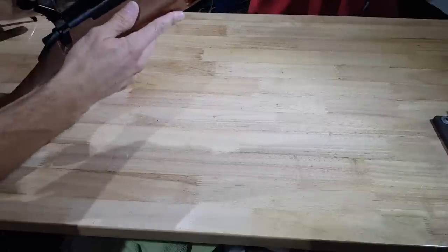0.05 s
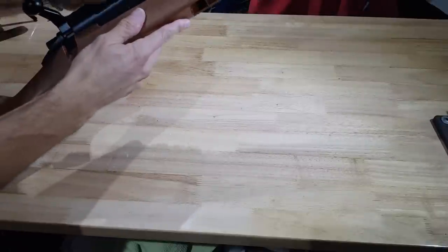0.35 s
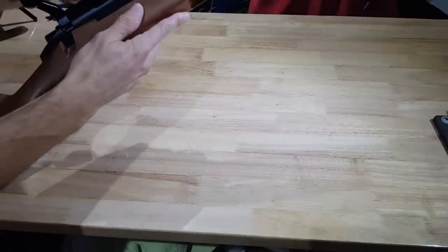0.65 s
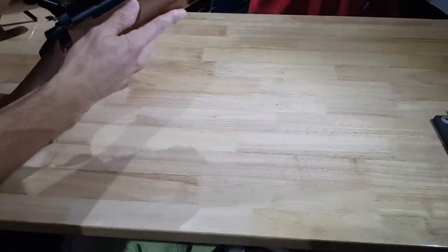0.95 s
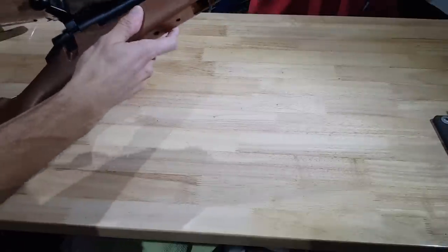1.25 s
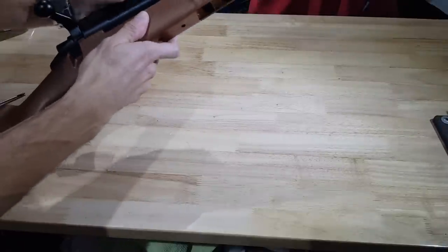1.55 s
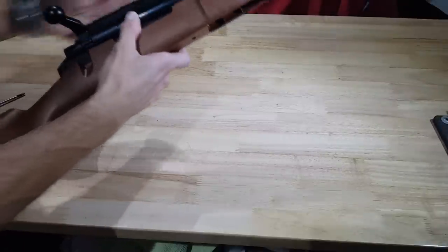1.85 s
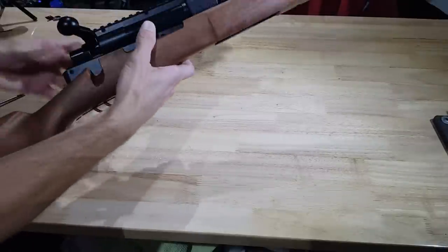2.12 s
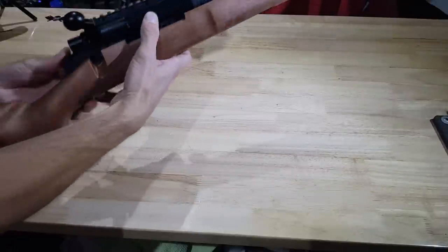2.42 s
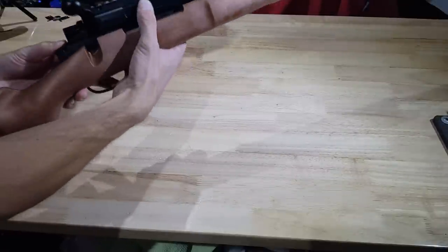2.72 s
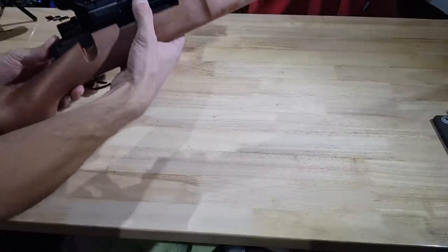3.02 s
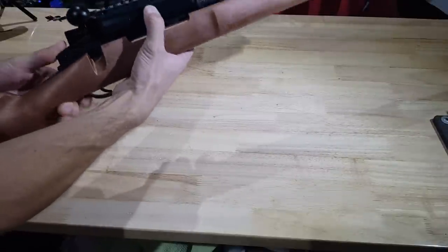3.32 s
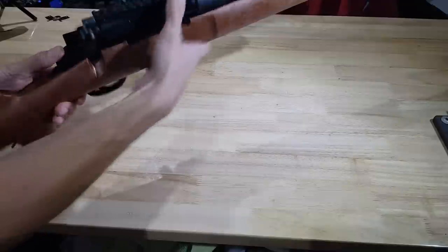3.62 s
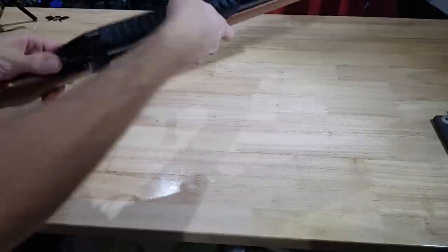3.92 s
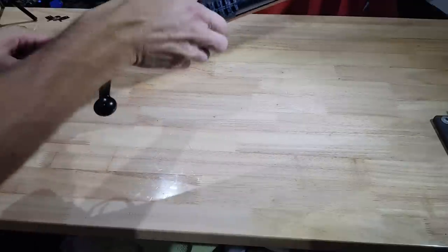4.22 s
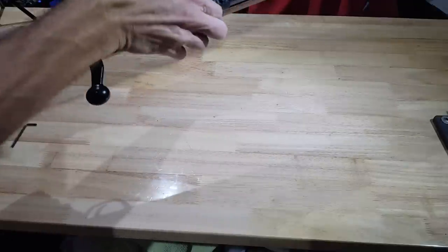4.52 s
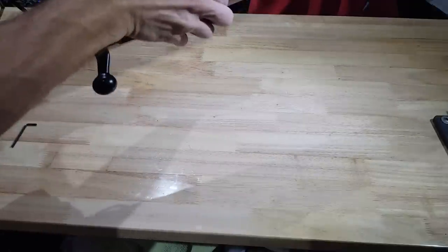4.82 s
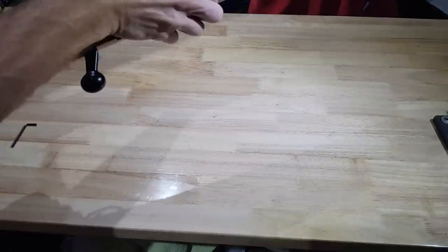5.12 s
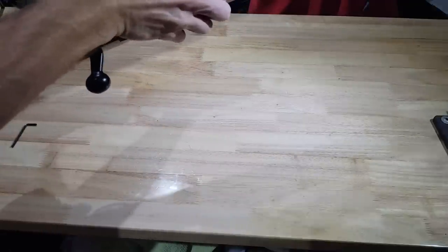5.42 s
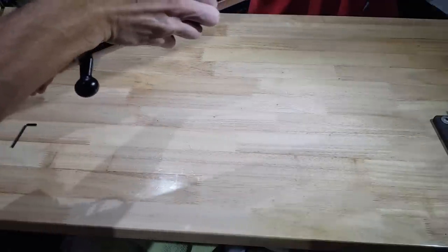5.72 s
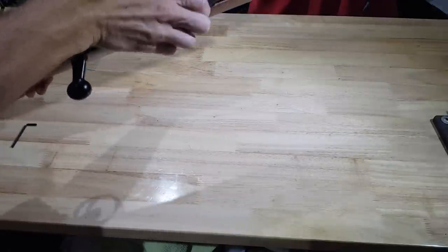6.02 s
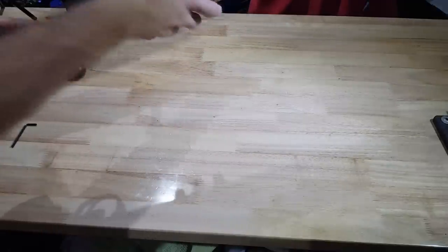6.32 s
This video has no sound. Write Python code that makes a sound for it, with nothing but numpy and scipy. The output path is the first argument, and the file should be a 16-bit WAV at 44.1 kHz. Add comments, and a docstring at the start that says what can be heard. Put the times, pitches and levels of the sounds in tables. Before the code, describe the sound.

Close up and slightly to the left, plastic parts click and knock irregularly as a toy rifle is turned over on a workbench. Hands slide softly over the hollow stock between the clicks. The action is then pushed back into place with scraping, brief metallic rings and dull thumps, building to a quick run of hard clacks near the end. The small room adds a short echo, low hum and faint hiss.

```python
"""Toy rifle on a workbench

A toy bolt-action rifle is turned over in a small room, and its action is pressed back into the stock.
Plastic parts click, knock and scrape, ringing the hollow stock. Heavy blows thump the bench, a steel
part rings now and then, and hands slide over the stock. A low hum and a faint hiss lie underneath."""
import sys
import numpy as np
from scipy import signal
from scipy.fft import rfft, irfft, next_fast_len
from scipy.io import wavfile
from scipy.ndimage import map_coordinates

SR = 44100
rng = np.random.default_rng(int(sys.argv[2]) if len(sys.argv) > 2 else 0)


def inscribe(sig):
    """Save sig as 16-bit PCM at rate SR to the path in sys.argv[1].

    A 1-D sig is mono; a 2-D sig holds one channel per row.
    Samples are clipped to [-1, 1] before scaling.
    """
    pcm = np.round(np.clip(np.atleast_2d(sig).T, -1, 1) * 32767)
    wavfile.write(sys.argv[1], SR, pcm.astype(np.int16))


N = 284753


def amp(db):
    """Turn decibels into a gain to multiply by."""
    return 10 ** (np.asarray(db) / 20)


def unit(x):
    """Scale a sound to an average power of 1."""
    return x / np.sqrt(np.mean(x ** 2) + 1e-20)


def fade(t, t60):
    """Die away by 60 dB every t60 seconds."""
    return amp(-60 * t / np.maximum(t60, 1e-3))


def along(points, hz):
    """Read between the rows of a (frequency, value) table, with octaves evenly spaced."""
    f, v = np.transpose(points)
    return np.interp(np.log(hz + 1), np.log(f), v)


def wobble(rate):
    """A smooth curve through `rate` random values a second."""
    return map_coordinates(rng.standard_normal(int(N * rate / SR) + 4), [np.arange(N) * rate / SR])


def swell(s, length):
    """Grow smoothly louder until time s, then fade again."""
    stroke = np.zeros(N)
    near = np.arange(max(int((s - 2 * length) * SR), 0), min(int((s + 2 * length) * SR), N))
    stroke[near] = np.exp(-2 * ((near / SR - s) / length) ** 2)
    return stroke


def resonance(hz, centre, width):
    """The power curve of one ringing tone: 1 at its centre, less to either side."""
    return 1 / (1 + (2 * (hz - centre) / width) ** 2)


def filtered(x, response):
    """Scale each frequency in x by response(hz)."""
    size = x.shape[-1]
    padded = next_fast_len(2 * size)
    return irfft(rfft(x, padded) * response(np.fft.rfftfreq(padded, 1 / SR)), padded)[..., :size]


def causal(gain):
    """A filter with these gains that rings only after it is struck (minimum phase)."""
    cepstrum = irfft(np.log(np.maximum(gain, 1e-5)))
    half = cepstrum.shape[-1] // 2
    return np.exp(rfft(cepstrum * np.r_[1, np.full(half - 1, 2), 1, np.zeros(half - 1)]))


def panned(lean_db):
    """Left and right gains: the left is lean_db louder, and the total power stays the same."""
    gains = amp(np.array([np.atleast_1d(lean_db), -np.atleast_1d(lean_db)]) / 2)
    return gains / np.sqrt(np.mean(gains ** 2, axis=0))


def add(track, s, sound):
    """Mix a sound in at time s."""
    part = track[:, max(round(s * SR), 0):][:, :sound.shape[1]]
    part += sound[:, :part.shape[1]]


# how alike the two ears' sounds are: f/Hz, likeness (1 = the same)
EAR_LIKENESS = [(100, .92), (350, .8), (700, .6), (1400, .35), (2800, .2), (5600, .05)]
def stereo_noise(size, spectrum):
    """Shaped noise, alike in both ears in the bass and unrelated in the treble."""
    def response(hz):
        turn = np.arccos(np.clip(along(EAR_LIKENESS, hz), -1, 1)) / 2
        return amp(along(spectrum, hz)) * [np.cos(turn), np.sin(turn)]
    mid, side = filtered(rng.standard_normal((2, size)), response)
    return unit(np.array([mid + side, mid - side]))


# tone of the room's hiss: f/Hz, level/dB
AIR_TONE = [(20, -1.5), (60, 1), (100, 4), (160, -2.5), (300, -13.5), (700, -15.5), (1500, -26),
            (4000, -11), (6000, -9), (8000, -23.5), (11000, -13), (16000, -22.5)]
def background(hum_hz, hum_db, air_db):
    """A low, slightly wavering hum under the room's hiss."""
    phase = 2 * np.pi * np.cumsum(hum_hz + 0.99 * wobble(5.6)) / SR
    hum = amp(hum_db + .8 * wobble(5)) * unit(np.sin(phase))
    return hum * panned(lean_db=3.5) + amp(air_db) * stereo_noise(N, AIR_TONE)


# how long the room echoes: f/Hz, t60/s
ECHO_T60 = [(150, 0.28), (500, 0.35), (1500, 0.4), (4000, 0.41), (8000, 0.32), (14000, 0.27)]
# tone of that echo: f/Hz, level/dB
ECHO_TONE = [(150, -1.5), (500, 1.5), (1000, 1), (1350, -2.5), (1900, -2), (4000, -5), (8000, -1.5),
             (14000, 0.5)]
def room_echo(sound, build_s, size=22050):
    """The room answers a sound with a short wash of echoes; the middle pitches last longest."""
    hz, t, noise = signal.stft(stereo_noise(size, [(20, 0), (20000, 0)]), SR, nperseg=256)
    dying = noise * fade(t, along(ECHO_T60, hz)[:, None]) * amp(along(ECHO_TONE, hz))[:, None]
    tail = signal.istft(dying, SR, nperseg=256)[1][:, :size]
    tail *= 1 - np.exp(-(np.arange(size) / SR / build_s) ** 2)
    tail /= np.sqrt(np.sum(tail ** 2) / 2)
    return signal.fftconvolve(sound, tail, axes=1)


# tone of rubbing skin: f/Hz, level/dB
RUB_TONE = [(200, -20.5), (500, -11.5), (900, -11), (1360, 1), (1800, -7), (2700, -2), (4200, 2),
            (6000, -4.5), (8000, -25), (16000, -41)]
# tone of its fine hiss: f/Hz, level/dB
HISS_TONE = [(2000, -38.5), (6000, 2), (8000, -6), (11500, 1), (14500, -5), (17000, -4.5), (19000, -30)]
# hand strokes over the stock: middle t/s, length/s, level/dB
HAND_STROKES = [(0.241, 0.085, -53), (0.525, 0.02, -49), (1.183, 0.058, -55.5), (1.624, 0.11, -54),
                (1.998, 0.021, -60), (2.315, 0.2, -61), (2.937, 0.035, -52.5), (3.229, 0.047, -53.5),
                (3.6, 0.18, -52), (3.757, 0.039, -51), (4.02, 0.23, -54.5), (6.45, 0.15, -57.5)]
def sliding_hands(hiss_db, hiss_growth, usual_db):
    """Skin slides over the stock with a smooth rub; a faster slide is louder and hisses more."""
    rub, hiss = np.zeros((2, N))
    for s, length, db in HAND_STROKES:
        stroke = swell(s, length)
        rub += amp(db) * stroke
        hiss += amp(hiss_db + hiss_growth * (db - usual_db)) * stroke
    return (rub * stereo_noise(N, RUB_TONE) + hiss * stereo_noise(N, HISS_TONE)) * amp(wobble(35))


def drags(max_gap_s=.05, gap_share=0.74, base_db=-39.5, growth=0.53):
    """Parts stay in touch and scrape between the clicks of one push: middle t/s, length/s, level/dB."""
    return [((s + next_s) / 2, gap_share * (next_s - s), base_db + growth * min(db, next_db))
            for (s, db, *_), (next_s, next_db, *_) in zip(PART_HITS, PART_HITS[1:])
            if next_s - s < max_gap_s]


# tone of scraping plastic: f/Hz, level/dB
SCRAPE_TONE = [(120, -40), (200, -27.5), (529, -26), (647, -31.5), (1480, -3.5), (1770, -18.5),
               (1940, -7.5), (2510, -14), (3370, -8), (5730, -15), (8270, -30), (11100, -33),
               (16000, -62.5)]
# a knock dying away at the start, then parts sliding into place: middle t/s, length/s, level/dB
PLASTIC_SWELLS = [(0, 0.065, -52.5), (.265, 0.01, -50), (.625, 0.031, -53), (.872, 0.014, -34.5),
                  (1.724, .011, -44.5), (2.63, 0.037, -57.5), (3.86, 0.056, -65.5), (3.315, 0.017, -57.5),
                  (4.34, 0.039, -56.5), (4.7, 0.06, -43), (5.006, 0.035, -55), (5.336, 0.023, -44),
                  (5.66, 0.051, -57), (5.8, 0.1, -50), (6.018, 0.03, -50), (6.038, 0.01, -30)]
def scraping_parts(level_db, slip_db, grain_db):
    """Plastic scrapes in uneven little slips; the same rough noise makes the opening knock's tail."""
    slips = unit(amp(slip_db * wobble(64) + grain_db * wobble(600)))
    swells = sum(amp(db + level_db) * swell(s, length) for s, length, db in [*PLASTIC_SWELLS, *drags()])
    return stereo_noise(N, SCRAPE_TONE) * slips * swells


# blows that set the steel ringing: t/s, level/dB
STEEL_HITS = [(3.108, -46), (4.39, -29.5), (4.692, -44), (6.037, -38)]
# the steel's ringing tones: f/Hz, level/dB, t60/s
STEEL_TONES = [(1588, -10, .14), (2859, -22, .4), (3628, -9, .27), (3760, 9, .035), (3953, -10, .3),
               (4122, -8, .35), (4230, -13, .28), (5943, -23, .33), (6831, -22, .2), (7960, -24, .24),
               (9647, -27, .23)]
def ringing_steel(attack_s=0.00026, size=26000):
    """A steel part rings on after a few hard blows."""
    track, t = np.zeros((2, N)), np.arange(size) / SR
    onset = 1 - np.exp(-t / attack_s)
    for s, db in STEEL_HITS:
        for hz, tone_db, t60 in STEEL_TONES:
            phase = 2 * np.pi * rng.random() + rng.standard_normal((2, 1))  # each ear has its own
            add(track, s, amp(db + tone_db) * np.sin(2 * np.pi * hz * t + phase) * fade(t, t60) * onset)
    return track * panned(lean_db=8)


def seating(t, attack_s=.0014):
    """A blow builds up as the parts settle against each other."""
    return 1 - np.exp(-(t / attack_s) ** 2)


# the hollow stock's ringing tones: f/Hz, width/Hz, level/dB
STOCK_TONES = [(175, 12, 4.5), (359.5, 50.5, 10.5), (533, 130, 3), (742, 36, 5), (772, 120, -4),
               (885, 120, -1.5), (1296, 226, 8.5), (1763, 24, -6), (2130, 44, -16), (2230, 28, -19),
               (2738, 69, 4.5), (3590, 40, 4), (3765, 120, -2.5), (4260, 330, -1), (4700, 110, 0)]
def stock_gain(hz, between_db):
    """The stock favours its own tones; many weak ones fill the gaps between them."""
    peaks = sum(amp(2 * db) * resonance(hz, centre, width) for centre, width, db in STOCK_TONES)
    return np.sqrt(peaks + amp(2 * between_db))


# tone of the bench's thump: f/Hz, level/dB
BENCH_TONE = [(40, -12.5), (70, -1.5), (120, 1), (195, 6.5), (260, -12.5), (400, -31), (1000, -66)]
# blows that shake the whole rifle: t/s, bench level/dB, stock level/dB
HEAVY_HITS = [(0.868, -74, -32.5), (4.694, -46, -58), (5.073, -59, -59), (5.354, -59, -71),
              (5.727, -44.5, -69), (5.866, -43, -50), (6.037, -43, -36)]
def heavy_blows(bench_t60, room_db, size=16384):
    """The bench answers with a dull thump, and four of the stock's low tones boom."""
    track, t = np.zeros((2, N)), np.arange(size) / SR
    tones = sum(amp(db) * np.cos(2 * np.pi * hz * t) * np.exp(-np.pi * width * t)
                for hz, width, db in STOCK_TONES[1:5])
    boom = (tones * seating(t))[None]
    thump_shape = fade(t, bench_t60) * (1 - np.exp(-t / .002))
    for s, bench_db, boom_db in HEAVY_HITS:
        add(track, s, amp(bench_db) * stereo_noise(size, BENCH_TONE) * thump_shape)
        add(track, s, amp(boom_db) * boom)
        add(track, s, amp(boom_db + room_db) * room_echo(boom, build_s=.005))
    return track * panned(lean_db=5.0)


# the air space in the stock as the grip changes: t/s, level against the click/dB, f/Hz
CAVITY_GRIP = [(.52, -5.5, 1460), (.64, 7, 1230), (.87, -6.5, 1370), (1.3, -4, 1310), (2.2, -7, 1400),
               (2.64, 9.5, 1370), (3.1, -0.5, 1380), (3.34, 3, 1370), (3.7, -5, 1470), (4.3, 2.5, 1496),
               (4.7, -8.5, 1300), (5.049, -4.5, 1370), (6.04, -6, 1090)]
def stock_cavity(s, weight_db, click_hz, usual_weight_db=-11.5, usual_click_hz=2940):
    """The grip damps and tunes the cavity; weight drives it more, small high-pitched parts less."""
    times, levels, pitches = np.transpose(CAVITY_GRIP)
    drive_db = 0.33 * (weight_db - usual_weight_db) - 3 * np.log2(click_hz / usual_click_hz)
    return np.interp(s, times, levels) + drive_db, np.interp(s, times, pitches)


# tone of parts chattering together: f/Hz, level/dB
CHATTER_TONE = [(50, -22), (120, -14), (220, -8), (350, 0), (1200, 0), (4500, 0), (6200, -1), (8000, -7),
                (11000, -2), (15500, -7), (19000, -16)]
# extra lean of the clicks to one side: f/Hz, left minus right/dB
CLICK_LEAN = [(100, -2.5), (300, -4), (550, 2.5), (1200, 0), (2200, -4), (4200, 3), (8000, -3.5),
              (12000, -10.5)]
# parts meeting: t/s, level/dB, weight/dB, snap/dB (both against the click), click f/Hz, chatter t60/s
PART_HITS = [(.273, -35.5, -16, -31, 1980, 0.049), (0.491, -39, 1.5, -4, 1800, 0.056),
             (.506, -32, -3.5, 1.5, 4270, 0.1), (.526, -19, -19, -19, 4400, 0.0097),
             (.641, -30, -14.5, -17, 2200, 0.044), (.790, -41, -17, -27, 2390, 0.056),
             (0.845, -22, -20, -37, 2730, 0.11), (.868, -9, -5.5, -8, 3100, 0.055),
             (.903, -16, -17, -32, 4200, 0.081), (.931, -15.5, -39, -33, 3480, .017),
             (.962, -28.5, -12, -38, 1900, .014), (1.005, -31.5, -5, -28, 2400, 0.017),
             (1.055, -36.5, -8, -37, 3960, 0.0089), (1.26, -35.5, -50.5, -7.5, 5700, 0.012),
             (1.282, -45.5, -5.5, -23, 5000, 0.0062), (1.363, -44.5, -2, -3, 4120, 0.11),
             (1.397, -47.5, -3, -29, 1690, 0.026), (1.634, -42.5, -8, -16, 1700, 0.016),
             (1.657, -33.5, 1.5, -11.5, 3350, 0.0081), (1.7294, -14, -24.5, -20.5, 4400, 0.023),
             (2.137, -36, -16, -17, 4400, 0.16), (2.213, -30, -15.5, -11, 4020, 0.042),
             (2.503, -53, -1, -12, 2030, 0.12), (2.645, -29.5, -19, -19, 3520, 0.042),
             (2.835, -45, -4, -19, 2830, 0.16), (2.902, -42, -10, -16, 3240, 0.054),
             (3.079, -46, 1, -11, 1900, 0.083), (3.107, -15.5, -21.5, -22, 4200, 0.011),
             (3.32, -38.5, -6.5, -19, 3530, 0.018), (3.339, -22.5, -19.5, -28, 3160, 0.061),
             (3.718, -30, -62, -7, 5130, 0.011), (3.914, -47, 3, -12, 3900, 0.097),
             (4.035, -35.5, -29, -14, 3650, 0.038), (4.16, -23.5, -27, -21.5, 2740, 0.065),
             (4.362, -40.5, -13, -21, 2000, 0.021), (4.388, -15.5, -17.5, -13.5, 3850, 0.024),
             (4.457, -34, -16.5, -23, 3600, .015), (4.619, -33.5, -14, -34, 3440, 0.017),
             (4.667, -23, -5.5, -23, 1990, 0.044), (4.686, -12, -7.5, -13.5, 2300, 0.13),
             (4.702, -18.5, -5, -35, 3260, .03), (4.763, -30, -16, -42, 2300, .022),
             (4.818, -21, -10, -40, 2190, 0.019), (4.835, -33.5, 1.5, -20, 2300, 0.018),
             (4.998, -32.5, -3.5, -32, 2000, 0.035), (5.019, -31.5, -4.5, -34, 3160, 0.034),
             (5.064, -22, -3, -23, 3130, 0.054), (5.072, -14, -21.5, -30, 3600, 0.021),
             (5.243, -36.5, -1.5, -38, 2700, 0.0062), (5.257, -29.5, -31, -48, 2610, 0.017),
             (5.352, -14.5, -18.5, -17, 3240, 0.049), (5.627, -36, -8, -36, 1870, 0.013),
             (5.7084, -25, -11, -34, 4700, .01), (5.726, -14.5, -10.5, -23, 1940, 0.042),
             (5.749, -11.5, -17, -21, 4670, 0.024), (5.781, -22.5, -17, -11.5, 4500, 0.013),
             (5.812, -29.5, -4, -21, 4100, .022), (5.849, -15.5, -20, -26, 4800, 0.022),
             (5.865, -9.5, -11, -11, 2940, 0.011), (5.877, -15, -29, -6.5, 2740, 0.13),
             (5.926, -12, -36, -19.5, 4430, 0.025), (6.036, -4.5, -9.5, -13.5, 3420, 0.034),
             (6.052, -8.5, -12.5, -16.5, 2620, 0.066), (6.074, -14, -10, -23, 4030, 0.027),
             (6.273, -38, -16, -23, 2740, 0.01), (6.412, -35, -33, -16, 1900, 0.06)]
def clicking_parts(level_db, room_db, rattle_db, rattle_t60, cavity_width_hz, click_width_hz, size=8192):
    """Each hit is a brief chatter that rings the stock: weight thuds and knocks, a hard edge snaps."""
    track, t, hz = np.zeros((2, N)), np.arange(size) / SR, np.fft.rfftfreq(size, 1 / SR)
    below = [1 / (1 + (hz / edge_hz) ** 10) for edge_hz in (600, 1100, 1700, 7500)]
    thud, knock, cavity, click, snap = np.diff(below, axis=0, prepend=0, append=1)  # bands, low to high
    body = stock_gain(hz, between_db=-3)
    direction = causal(panned(5.5 + along(CLICK_LEAN, hz)))
    room_share = amp([0, 0, -2.5, 0, 0]) ** 2  # the cavity sends less into the room
    for s, db, weight_db, snap_db, click_hz, t60 in PART_HITS:
        # the blow dies away, and loose parts add a faint shiver
        shape = seating(t) * (fade(t, t60) + amp(rattle_db) * fade(t, rattle_t60))
        chatter = rfft(stereo_noise(size, CHATTER_TONE) * shape)
        cavity_db, cavity_hz = stock_cavity(s, weight_db, click_hz)
        width_hz = click_width_hz * 2 ** ((db + 31.5) / 15.5)  # a harder blow makes a broader click
        bands = np.array([thud, knock, cavity * resonance(hz, cavity_hz, cavity_width_hz),
                          click * resonance(hz, click_hz, width_hz), snap])
        # bring each of the five bands to its own level
        energy = bands @ np.mean(np.abs(chatter * body) ** 2, axis=0) / size
        powers = amp([weight_db - 10, weight_db, cavity_db, 0, snap_db]) ** 2 / energy
        colours = np.sqrt(np.array([powers, powers * room_share]) @ bands)
        to_ears, to_room = amp(db + level_db) * causal(body * colours)
        add(track, s, irfft(chatter * to_ears * direction))
        echo = room_echo(irfft(chatter[:1] * to_room), build_s=0.0028)
        add(track, s, amp(room_db) * panned(lean_db=3.0) * echo)
    return track


def scene():
    """The rifle close by, a little to the left, in the quiet room."""
    clicks = clicking_parts(level_db=14.5, room_db=-7, rattle_db=-17.5, rattle_t60=0.11,
                            cavity_width_hz=260, click_width_hz=1770)
    scrapes = scraping_parts(level_db=7.5, slip_db=3.5, grain_db=-2.0)
    hands = sliding_hands(hiss_db=-62, hiss_growth=2.2, usual_db=-54.5)
    rubbing = (scrapes + hands) * panned(lean_db=6.5)
    rubbing += amp(-4.5) * room_echo(rubbing, build_s=0.0035)[:, :N]
    steel = ringing_steel()
    thumps = heavy_blows(bench_t60=0.23, room_db=-14)
    return background(hum_hz=46.8, hum_db=-63.5, air_db=-66) + rubbing + steel + thumps + clicks


def record(dry):
    """Round off the highest peaks and cut away the very top of the treble."""
    ceiling, top_hz = .9, 16000
    rounded = dry / (1 + np.abs(dry / ceiling) ** 6) ** (1 / 6)
    return filtered(rounded, lambda hz: 1 / (1 + (hz / top_hz) ** 200))


dry = scene()
out = record(dry)
inscribe(out)
```